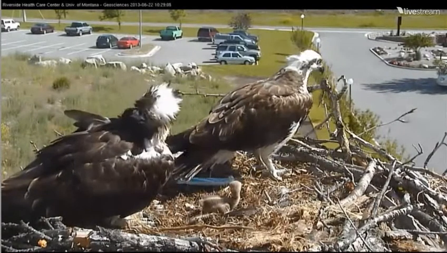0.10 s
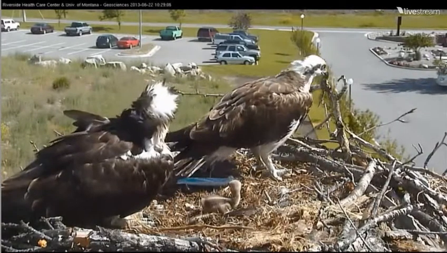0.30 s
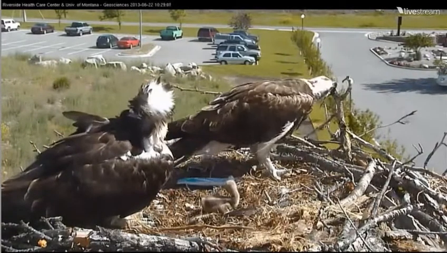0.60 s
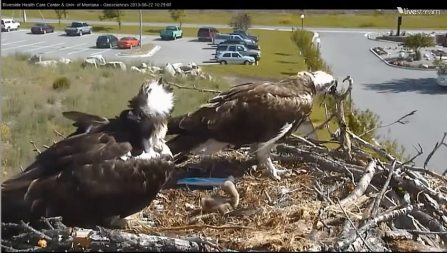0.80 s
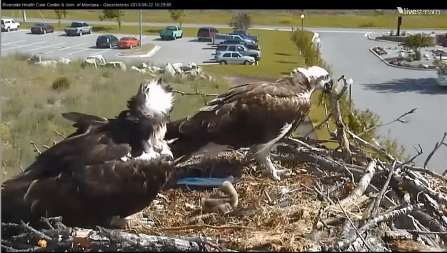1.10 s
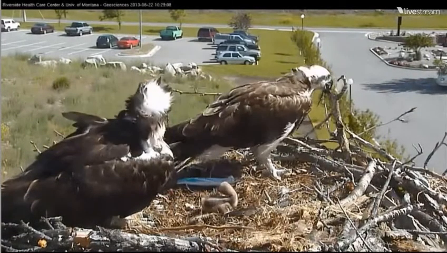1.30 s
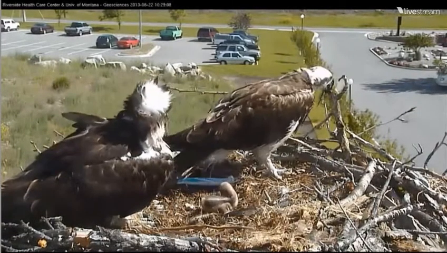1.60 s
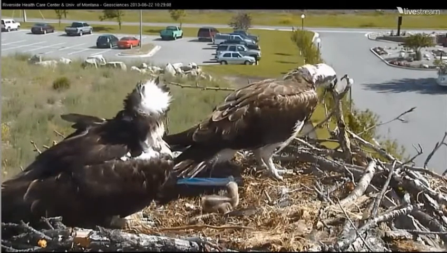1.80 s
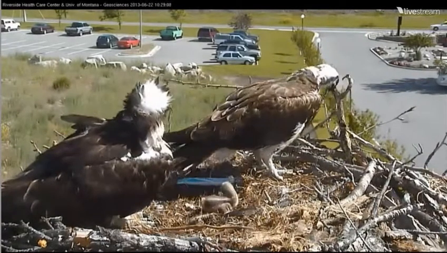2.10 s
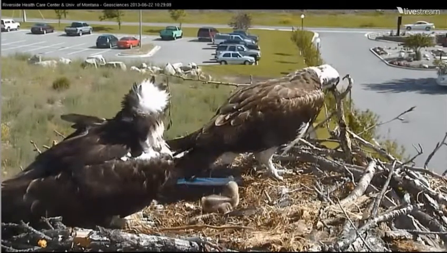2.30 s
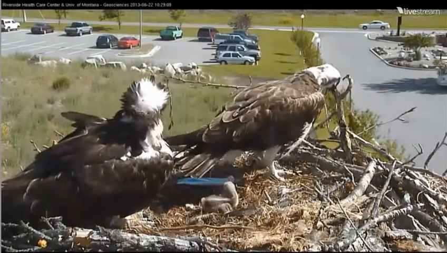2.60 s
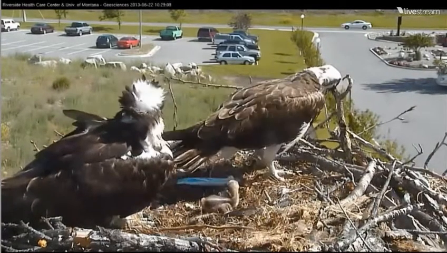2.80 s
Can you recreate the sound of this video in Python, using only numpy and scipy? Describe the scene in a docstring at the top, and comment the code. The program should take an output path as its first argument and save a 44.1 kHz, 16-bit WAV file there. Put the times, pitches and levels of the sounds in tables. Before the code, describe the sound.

An osprey gives three quick, high chirps, the second hoarse, the third breaking into a thin squeal. Steady outdoor hiss, low rumble and faint hum surround it, with tiny distant songbird twitters before and after.

```python
"""A steady outdoor hiss, a soft low rumble, mains hum and a faint treble fizz come first and last throughout.
A small songbird soon twitters far off, in tiny pure glides, and again near the end.
Then an osprey on its nest gives three quick chirps, built from gliding harmonics coloured by its throat.
The second chirp turns hoarse, with partials between its harmonics; the third cracks up into
a thin squeal and drops back."""
import sys
import numpy as np
from scipy import signal
from scipy.fft import rfft, irfft, next_fast_len
from scipy.io import wavfile
from scipy.ndimage import map_coordinates

SR = 44100
rng = np.random.default_rng(int(sys.argv[2]) if len(sys.argv) > 2 else 0)


def master(y):
    """Save y as 16-bit WAV."""
    cut = np.clip(np.atleast_2d(y).T, -1, 1)
    pcm = np.round(cut * 32767)  # scale
    wavfile.write(sys.argv[1], SR, pcm.astype(np.int16))


N = 132300  # length in samples: 3 s

HISS_DB = -47.4
MAINS_HZ, HUM_WAVER_DB = 120, 2.5  # lowest tone of the hum, and how much its level wanders
FIZZ_DB, FIZZ_ALIKE = -77, .05  # level, and the share of power common to left and right (0-1)
TWITTER_WET_DB, VOICE_WET_DB = -3, -29  # level of the scattered sound
ECHO_T60_S = 0.14  # time for the scattered sound to fade by 60 dB
JITTER, SHIMMER_DB, FLUTTER_PER_S = .002, 0.5, 330  # pitch wobble (fraction), level wobble, their rate
EDGE_S = 0.0014  # fade added at both ends of a call
FULL_VOICE_DB, DULLING = -40, .6  # below this level the upper partials lose extra dB per dB
LOWEST_HALF_DB = -9.5  # the split is weakest between the first two harmonics
THIRD_HARMONIC_DB = -7.5  # the lower register is hollow there
TOP_HZ = 15720


def amp(db):
    """Turn decibels into a gain."""
    return 10 ** (np.asarray(db) / 20)


def unit(x):
    """Scale a sound to an average (rms) level of 1."""
    return x / np.sqrt(np.mean(x ** 2) + 1e-20)


def clock():
    """Give the time of each sample in seconds."""
    return np.arange(N) / SR


def curves(rows):
    """Draw straight lines through each column after the time, one value per sample."""
    times, *columns = np.transpose(rows)
    return [np.interp(clock(), times, column) for column in columns]


def wobble(rate, knots=N // 16, t=None):
    """Draw a smooth random curve through `rate` random points a second."""
    t = clock() if t is None else t
    return map_coordinates(rng.standard_normal(knots), [t * rate], mode="wrap")


def filtered(x, response):
    """Multiply each frequency of a sound by a gain."""
    size = next_fast_len(N + SR // 2)  # spare room so that the end does not wrap to the start
    spectrum = rfft(x, size) * response(np.fft.rfftfreq(size, 1 / SR))
    return irfft(spectrum, size)[..., :N]


def along(points, hz):
    """Read the dB at any frequency from (Hz, dB) points, on a logarithmic pitch axis."""
    f, db = np.transpose(points)
    return np.interp(np.log(hz + 1), np.log(f), db)


def noise(spectrum):
    """Colour random noise by (Hz, dB) points and scale it to rms 1."""
    white = rng.standard_normal(N)
    return unit(filtered(white, lambda hz: amp(along(spectrum, hz))))


def air():
    """Steady hiss, and a low rumble that swells after the calls: both are coloured random noise."""
    # colour of the outdoor hiss: (frequency [Hz], relative level [dB per Hz])
    hiss_colour = [(20, -33), (120, -8.5), (260, -1), (550, 0), (1000, -1.3), (2050, -2.5), (2600, -2),
                   (2760, -6), (2900, -9.5), (3020, -12), (3150, -18), (3500, -15.5), (4050, -15.5),
                   (5000, -22.5), (6000, -29.5), (7400, -42.5), (10000, -65), (16000, -86)]
    # colour of the rumble: (frequency [Hz], relative level [dB per Hz])
    rumble_colour = [(15, -11), (35, 2), (60, 1.5), (80, 7), (100, -3), (170, -1), (260, -6), (600, -51),
                     (2000, -100)]
    # loudness of the rumble: (time [s], level [dB])
    rumble_level = [(0, -58.5), (.72, -61.5), (.83, -58), (1.15, -62), (1.45, -58), (1.72, -62), (2.3, -61),
                    (2.48, -50.5), (2.65, -55), (2.82, -60), (3, -62)]
    rumble_db, = curves(rumble_level)
    hiss = amp(HISS_DB) * noise(hiss_colour)
    rumble = amp(rumble_db) * noise(rumble_colour)
    return hiss + rumble


def hum():
    """Mains hum: three steady tones at multiples of the lowest, each wavering a little in level."""
    # loudness of the tones at 1, 2 and 3 times the lowest: level [dB]
    tone_levels = [-60.5, -64.5, -68]
    total = np.zeros(N)
    for k, db in enumerate(tone_levels, 1):
        level = amp(db + HUM_WAVER_DB * wobble(5.02))
        turns = k * MAINS_HZ * clock() + rng.random()
        total += np.sqrt(2) * level * np.sin(2 * np.pi * turns)
    return total


def fizz():
    """Faint electronic treble noise, mostly unrelated in the two channels."""
    # colour of the fizz: (frequency [Hz], relative level [dB per Hz])
    fizz_colour = [(3000, -41), (4700, -18.5), (6000, -1), (8500, 1.5), (15500, 0)]
    shared = np.sqrt(FIZZ_ALIKE) * noise(fizz_colour)
    separate = np.sqrt(1 - FIZZ_ALIKE) * np.array([noise(fizz_colour), noise(fizz_colour)])
    return amp(FIZZ_DB) * (shared + separate)


def outdoors(x, wet_db):
    """Add a short, fading scatter from the ground and trees."""
    t = np.arange(SR // 2) / SR
    tail = rng.standard_normal(len(t)) * np.exp(-np.log(1000) * t / ECHO_T60_S)
    scattered = signal.fftconvolve(x, tail / np.linalg.norm(tail))[:N]
    return x + amp(wet_db) * scattered


def songbird():
    """Tiny far-off notes: each is one pure tone that glides in pitch while it swells and fades."""
    # the notes: (start [s], length [s], start pitch [Hz], end pitch [Hz], level [dB])
    notes = [(0.55, 0.011, 3680, 4100, -63), (.568, 0.021, 4480, 3930, -63),
             (0.586, 0.016, 3960, 4000, -64), (.601, 0.014, 3300, 3720, -64),
             (0.613, 0.012, 3570, 3070, -58), (.670, 0.0091, 4150, 5000, -58),
             (0.703, 0.012, 4320, 4300, -61), (2.254, 0.01, 4900, 4770, -66),
             (2.27, .019, 4390, 3790, -57.5), (2.298, 0.0184, 3040, 3900, -59),
             (2.321, 0.015, 3650, 3130, -60)]
    song = np.zeros(N)
    for start, length, from_hz, to_hz, db in notes:
        progress = np.clip((clock() - start) / length, 0, 1)
        pitch = from_hz + (to_hz - from_hz) * progress
        phase = 2 * np.pi * np.cumsum(pitch) / SR
        song += np.sqrt(2) * amp(db) * np.sin(np.pi * progress) * np.sin(phase)
    return outdoors(song, TWITTER_WET_DB)


def call(rows, third_db=0, count=6):
    """A gliding tone of the syrinx (voice organ); hoarseness doubles its period, adding half-way partials."""
    # colour that throat and beak give to every partial: (frequency [Hz], gain [dB])
    throat = [(1550, -12), (1700, -5.5), (1900, 2), (2500, -0.5), (3100, -4), (3330, -1.5), (3480, 1),
              (3750, -10.5), (4300, -16), (4750, -18.5), (5100, -26.5), (6000, -29), (6700, -33.5),
              (7500, -36.5), (8400, -37.5), (9300, -49), (12000, -66)]
    pitch, level_db, hoarse = curves(rows)
    t = clock()
    inside = np.minimum(t - rows[0][0], rows[-1][0] - t)  # seconds from the nearer end
    gate = np.clip(inside / EDGE_S + 1, 0, 1)
    on = gate > 0
    shaky_pitch = pitch * (1 + JITTER * wobble(FLUTTER_PER_S))
    phase = 2 * np.pi * np.cumsum(shaky_pitch[on]) / SR
    soft_db = DULLING * np.minimum(level_db[on] - FULL_VOICE_DB, 0)

    def partial(k):
        """One sine at k times the pitch, with its own shimmer; soft moments dull the upper ones."""
        shimmer_db = SHIMMER_DB * wobble(FLUTTER_PER_S, N // 64, t[on])
        gain_db = along(throat, k * pitch[on]) + shimmer_db + soft_db * (k > count / 2)
        return amp(gain_db) * np.sin(k * phase)

    clear = sum(partial(k) * amp(third_db * (k == 3)) for k in range(1, count + 1))
    split = sum(partial(k + .5) * amp(LOWEST_HALF_DB * (k == 1)) for k in range(1, count))
    tone = np.zeros(N)
    tone[on] = clear + np.clip(hoarse[on], 0, 1) * split
    return np.sqrt(2) * gate * amp(level_db) * tone


def osprey():
    """Three chirps in the lower register, and the high squeal that the third one cracks into."""
    # one curve per chirp, then the short drop back after the squeal:
    # (time [s], pitch [Hz], level [dB], hoarseness [0-1])
    chirp_curves = [
        [(1.724, 1605, -60, 0), (1.732, 1657, -41, 0), (1.742, 1672, -39, 0), (1.753, 1648, -38, 0),
         (1.761, 1586, -46, 0), (1.768, 1540, -51, 0)],
        [(1.924, 1660, -53, 0), (1.930, 1645, -35, 0), (1.937, 1638, -41.5, .1), (1.945, 1694, -39, 0.9),
         (1.973, 1731, -40.5, 1), (1.987, 1694, -39.5, .8), (1.995, 1634, -38.5, 0.5), (2.003, 1530, -57, .2)],
        [(2.131, 1725, -61, 0.08), (2.139, 1730, -36, 0.2), (2.147, 1693, -37, .15), (2.153, 1770, -40, 0.16),
         (2.159, 1865, -42, 0.4), (2.165, 1900, -57, 0.4)],
        [(2.232, 1790, -82, .2), (2.237, 1690, -50, .2), (2.241, 1680, -43, .2), (2.248, 1570, -58, .2)],
    ]
    # the voice in its upper register: (time [s], pitch [Hz], level [dB], hoarseness [0-1])
    squeal_curve = [(2.165, 2420, -61, 0), (2.175, 2493, -35, .1), (2.187, 2524, -37.5, 0.34),
                    (2.200, 2467, -39, 0.3), (2.215, 2422, -37.5, 0.17), (2.227, 2470, -61, 0)]
    chirps = sum(call(rows, third_db=THIRD_HARMONIC_DB) for rows in chirp_curves)
    squeal = call(squeal_curve)
    return outdoors(chirps + squeal, VOICE_WET_DB)


def scene():
    """Add up all the sounds; all but the fizz are the same in both channels."""
    return air() + hum() + fizz() + songbird() + osprey()


def record(dry):
    """Keep nothing at or above the band limit."""
    return filtered(dry, lambda hz: hz < TOP_HZ)


dry = scene()
out = record(dry)
master(out)
```